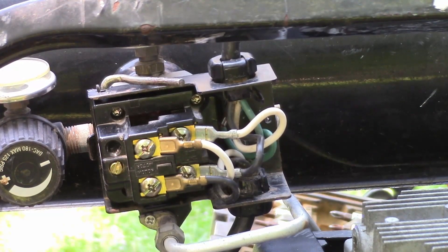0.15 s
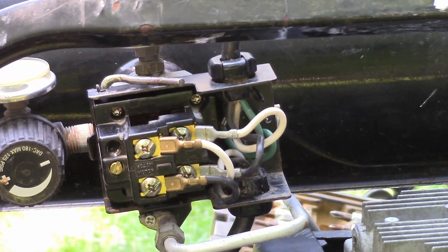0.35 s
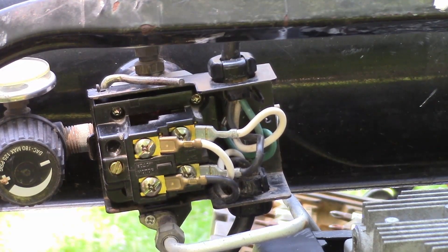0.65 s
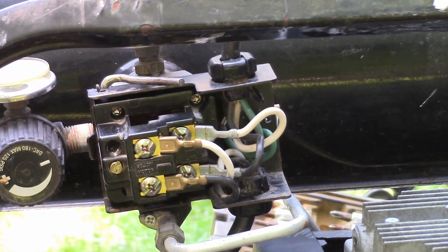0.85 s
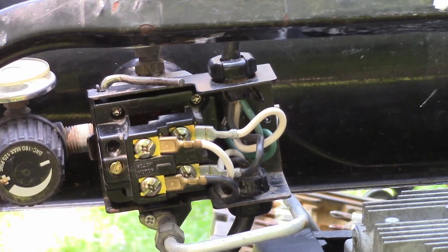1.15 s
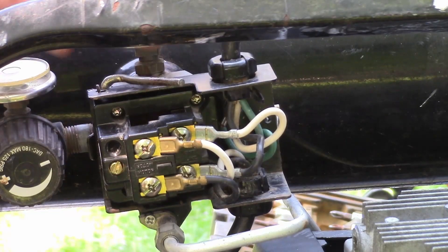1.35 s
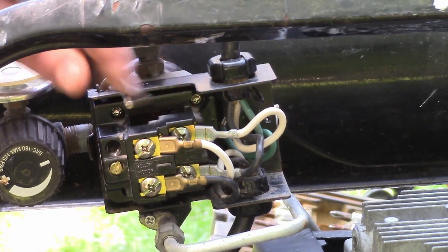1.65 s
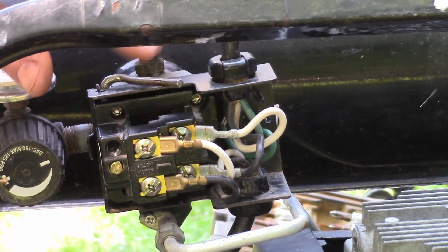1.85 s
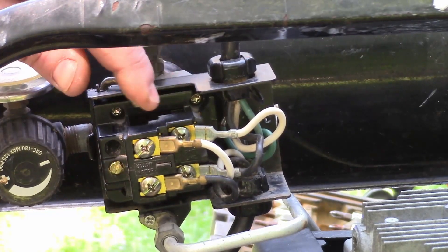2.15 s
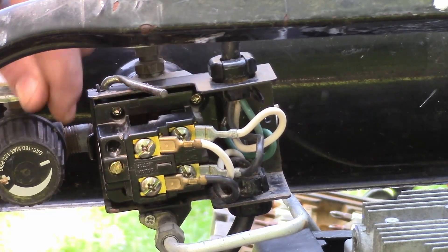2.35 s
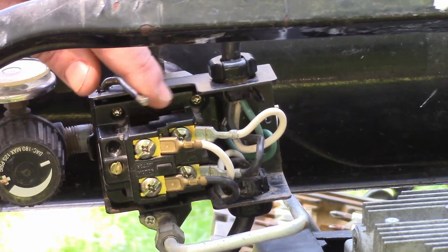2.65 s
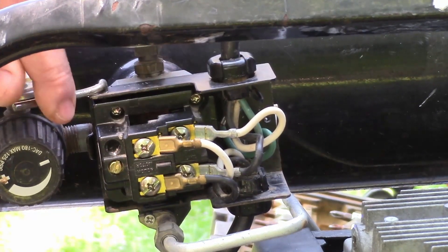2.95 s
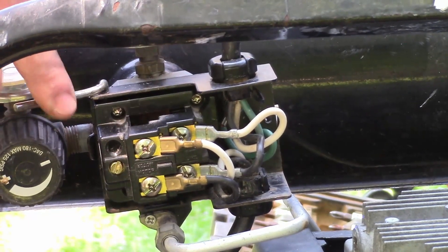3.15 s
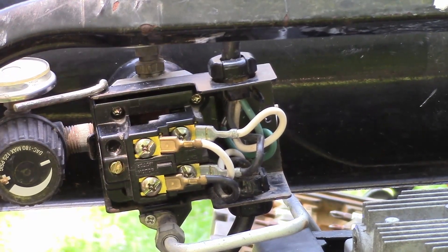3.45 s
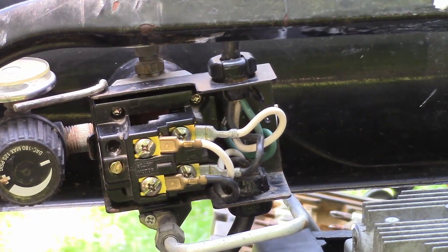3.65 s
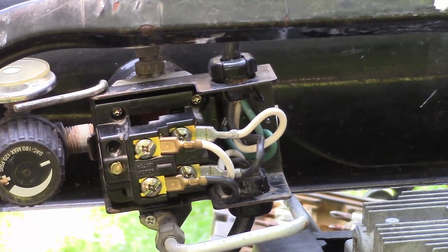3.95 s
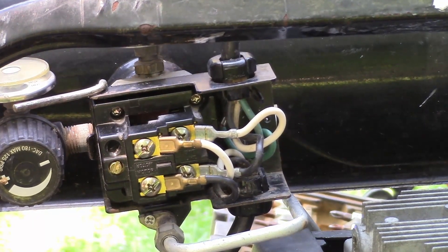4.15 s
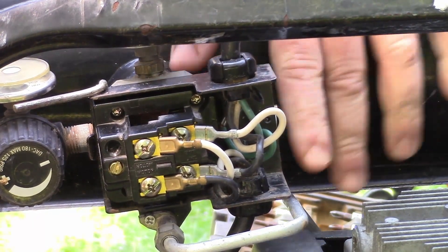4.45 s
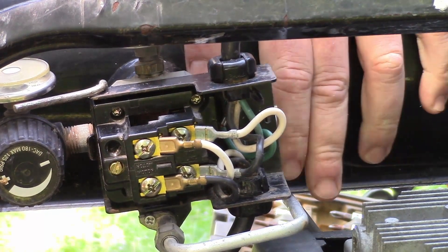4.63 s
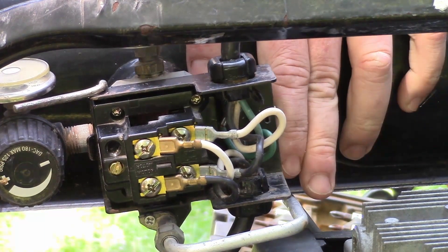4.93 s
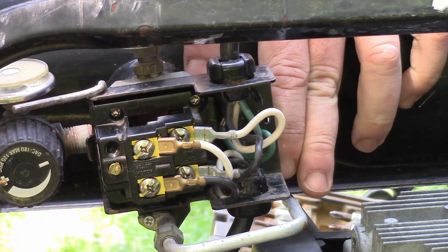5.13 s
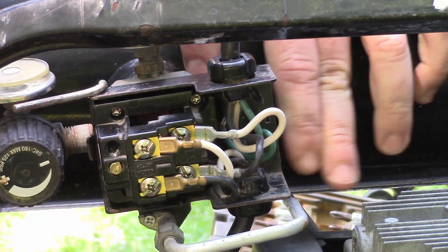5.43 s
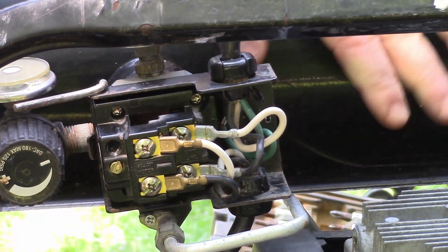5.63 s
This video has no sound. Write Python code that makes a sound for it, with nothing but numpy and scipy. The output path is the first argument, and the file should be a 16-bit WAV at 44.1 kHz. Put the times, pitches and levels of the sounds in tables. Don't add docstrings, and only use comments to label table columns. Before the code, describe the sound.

Close air compressor chugs under a roaring air jet, the motor stops, the hiss cuts off abruptly, leaving a faint yard with birds.

```python
import sys
import numpy as np
from scipy import signal
from scipy.fft import rfft, irfft, next_fast_len
from scipy.io import wavfile
from scipy.ndimage import uniform_filter1d

SR = 44100
rng = np.random.default_rng(int(sys.argv[2]) if len(sys.argv) > 2 else 0)


def volts(x):
    e = np.asarray(x, float) / 20
    return 10 ** e


def transcribe(signal):
    frames = np.atleast_2d(signal).T
    limited = np.clip(frames, -1, 1)
    pcm = np.round(limited * 32767).astype(np.int16)
    wavfile.write(sys.argv[1], SR, pcm)


N = 255339
TIME = np.arange(N) / SR
PAD = next_fast_len(N + SR // 4)
FREQ = np.maximum(np.arange(PAD // 2 + 1) * SR / PAD, 1.)

LAST_STEADY_S = 2.8475
PUSH_S, SHUT_S = 4.88, 5.061
GAIN_STEP_S, GAIN_STEP_DB = 5.2535, 12.5


def level(x, db):
    return x * volts(db) / np.sqrt(np.mean(x ** 2))


def colour(points):
    hz, db = np.transpose(points)
    return volts(np.interp(np.log(FREQ), np.log(hz), db))


def shaped(x, gain):
    return irfft(rfft(x, PAD) * gain, PAD)[:N]


def noise(gain):
    return shaped(rng.standard_normal(N), gain)


def walk(rate_hz, size=N):
    hold = int(SR / rate_hz)
    steps = np.repeat(rng.standard_normal(size // hold + 1), hold)
    return 1.5 * uniform_filter1d(uniform_filter1d(steps, hold), hold)[:size]


def echo(x, t60_s, db):
    t = TIME[:SR]
    tail = rng.standard_normal(len(t)) * np.exp(-np.log(1000) * t / t60_s) * np.minimum(t / .003, 1)
    return signal.fftconvolve(x, tail * volts(db) / np.sqrt(np.sum(tail ** 2)))[:N]


# pitch_hz, level_db (per Hz)
JET_COLOUR = [(35, -71.5), (60, -54), (163, -25), (415, -5.5), (690, -4.5), (1270, -0.5), (1500, -3.5),
              (2320, -5.5), (5500, -3), (7990, -10), (11900, -5), (13900, -16.5), (15700, -19)]
# pitch_hz, width_hz, level_db (over the jet colour)
VALVE_RINGS = [(873, 250, 2), (1266, 200, 2.5), (2000, 170, 2.5), (2770, 150, 3.5), (3280, 170, 3),
               (3760, 130, 2.5), (4640, 280, 4), (5480, 240, 4.5), (6095, 130, 4.5), (6780, 170, 3),
               (7570, 96, 4.5), (8670, 220, 4), (9190, 100, 3), (10570, 400, 1), (11570, 220, -4.5),
               (12600, 220, -3), (14150, 240, 6), (15080, 230, 4.5)]


def valve_colour():
    rings_db = sum(db / (1 + (2 * (FREQ - hz) / width) ** 2) for hz, width, db in VALVE_RINGS)
    return colour(JET_COLOUR) * volts(rings_db)


# low_hz, high_hz
JET_BANDS = [
    (2500, 7000),
    (750, 2500),
    (7000, 15500),
    (380, 750),
]
# time_s, level_db (of the core)
FLOW = [
    (0.0, -29.5),
    (1.67, -32),
    (2.77, -32),
    (2.78, -32.5),
    (3.61, -32.5),
    (4.69, -32),
    (4.87, -32),
]
# level_db (re mean flow), flow_share (dB per dB),
# drift_db_per_s (as the tank empties), last_choke_db
JET_MIX = [
    (0, 0.89, 0, 3),
    (-4.5, 0.33, 0.04, -12),
    (-3.5, 1.7, 0.18, -5),
    (-17.5, .4, 1.11, 5),
]


def jet(swell_db=.25, flicker_db=.85):
    mean_flow_db, push_db, push_length_s = -32, -9.5, 0.081
    choke_s, shut_fall_s = 0.016, 0.0026
    shape = valve_colour()
    flow_s, flow_db = np.transpose(FLOW)
    flow = np.interp(TIME, flow_s, flow_db) - mean_flow_db
    pushed = push_db * np.clip((TIME - PUSH_S) / push_length_s, 0, 1)
    choked = np.clip(1 + (TIME - SHUT_S) / choke_s, 0, 1)

    gain_db = []
    for (low, high), (db, share, drift, choke) in zip(JET_BANDS, JET_MIX):
        wanted_db = mean_flow_db + db + share * flow + drift * TIME + pushed + choke * choked
        power = 4 * np.sum(shape[(FREQ > low) & (FREQ < high)] ** 2) / PAD / 2
        gain_db.append(wanted_db - 10 * np.log10(power))
    gain_db = np.array(gain_db)

    centres = np.log2([np.sqrt(low * high) for low, high in JET_BANDS])
    order = np.argsort(centres)
    air = rfft(rng.standard_normal(N), PAD) * shape
    swell = swell_db * walk(4.71)
    out = np.zeros(N)
    for octave in np.arange(17, 43) / 3:
        blend = np.array([np.interp(octave, centres[order], row[order]) for row in np.eye(4)])
        window = np.maximum(1 - 3 * np.abs(np.log2(FREQ) - octave), 0)
        band = irfft(air * window, PAD)[:N]
        out += band * volts(blend @ gain_db + swell + flicker_db * walk(11))
    return out * np.exp(-np.maximum(TIME - SHUT_S, 0) / shut_fall_s)


# start_s, stroke_db, slap_db
RUNDOWN = [
    (2.884, 1, -8),
    (2.931, -1, -15),
    (2.987, -22, 2.5),
    (3.101, -22, 1.5),
]
# pitch_hz, level_db
INTAKE = [(20, -30.5), (58, -13), (105, -13), (146, 0.5), (230, 3), (300, 1), (370, -1), (450, -25)]
# pitch_hz, level_db
OUTLET = [(100, -31), (150, -11.5), (205, -0.5), (250, -2), (330, -5), (420, -27)]


def pump(slap_s=0.01435, scatter_db=1.0):
    stroke_hz, speed_up_hz_per_s = 29.24, .026
    pump_db, pump_rise_db_per_s, slap_rise_db_per_s = -50.5, 1.48, 0.1
    slap_later_s_per_s = .00012
    ago = np.arange(0, LAST_STEADY_S + 1 / stroke_hz, 1 / stroke_hz)
    steady = LAST_STEADY_S - ago * (1 + .5 * ago * speed_up_hz_per_s / stroke_hz)
    strokes = np.array([(s, 0, slap_rise_db_per_s * s) for s in steady] + RUNDOWN)
    start = strokes[:, 0]
    kick_db = strokes[:, 1:] + scatter_db * rng.standard_normal((len(strokes), 2))

    def pulses(start_s, db, shape):
        at = (start_s * SR).astype(int)
        kicks = np.bincount(at[at >= 0], volts(db)[at >= 0], N)
        return shaped(kicks, colour(shape))

    sucks = pulses(start, kick_db[:, 0], INTAKE)
    slaps = pulses(start + slap_s + slap_later_s_per_s * start, kick_db[:, 1], OUTLET)
    thump = slaps - sucks
    rise_db = pump_rise_db_per_s * np.minimum(TIME, LAST_STEADY_S)
    return thump / np.std(thump[TIME < LAST_STEADY_S]) * volts(pump_db + rise_db)


# time_s, half_length_s, level_db
ROCKS = [
    (2.96, .03, -72),
    (3.19, .035, -65),
    (3.78, .05, -74),
]


def rumble(uneven_db=3.5):
    run_db, jet_db, ground_db = -74, -88, -82
    still_s, settle_s, rock_hz = 2.96, .04, 33
    shake = level(noise(colour([(10, -23), (25, -1), (70, 0.5), (110, -17), (300, -54.5)])), 0)
    motor = volts(run_db) * np.exp(-np.maximum(TIME - still_s, 0) / settle_s)
    venting = volts(jet_db) * (TIME < PUSH_S)
    ground = volts(ground_db) * np.clip((TIME - SHUT_S) / (GAIN_STEP_S - SHUT_S), 0, 1) ** 2
    rocks = np.zeros(N)
    for s, half, db in ROCKS:
        sway = 1.6 * np.sin(2 * np.pi * rock_hz * (TIME - s)) + .9 * shake
        rocks += volts(db) * np.exp(-((TIME - s) / half) ** 2) * sway
    return shake * (motor + venting + ground) * volts(uneven_db * walk(8)) + rocks


# pitch_hz, level_db
TANK_AND_WALLS = [(150, 3), (900, -3), (1250, 2.5), (1700, -2), (4800, -0.5), (5450, 1.5), (6200, -4),
                  (11000, -16), (15700, -18.5)]


def reflected(air):
    dull = shaped(air, colour(TANK_AND_WALLS))
    return air + echo(air, .12, -18) + echo(dull, .5, -28.5)


# time_s, centre_hz
SPLITS = [(.34, 8200), (.94, 12700), (.94, 7070), (.99, 11100), (1.82, 14500), (2.10, 11700), (2.17, 9200),
          (2.49, 15000), (2.49, 5630), (2.70, 11100), (3.01, 10240), (3.01, 7000), (3.03, 4990),
          (3.07, 8800), (3.07, 6400), (3.14, 4700), (3.56, 13800), (3.72, 9640), (3.72, 4700), (3.81, 4680),
          (4.35, 7000), (4.35, 4760), (4.37, 14800), (4.65, 6720)]


def splits(air, width_hz=1500, size=1536):
    out = np.zeros(N)
    hz_axis = np.arange(size // 2 + 1) * SR / size
    for s, hz in SPLITS:
        start = 619 + 1024 * round((s * SR - 619) / 1024) - size // 2
        other = air[start - size:start]
        in_band = np.abs(hz_axis - hz) < width_hz / 2
        out[start:start + size] += np.hanning(size) * irfft(rfft(other) * in_band, size)
    return out


# pitch_hz, level_db (per Hz)
HUSH_COLOUR = [(47, -8), (80, 3.5), (392, -7), (610, -4.5), (1970, -15), (3200, -10), (4460, -18.5),
               (12500, -30), (13500, -33.5), (15700, -38.5)]


def hush():
    return level(noise(colour(HUSH_COLOUR)), -69.0) * volts(.7 * walk(13))


def capsule():
    hiss = noise(colour([(60, 2), (700, -5), (2000, -9), (3500, -14), (7000, -10), (12500, -11), (14000, -25)]))
    return level(hiss, -88.5) * (TIME > SHUT_S)


# start_s, length_s, first_hz, aim_hz, level_db
BIRDS = [
    (5.190, .22, 6600, 5050, -77),
    (5.243, .15, 2750, 2460, -77.5),
    (5.250, .025, 3900, 3780, -80),
    (5.316, .08, 3620, 3400, -77),
    (5.322, .02, 4550, 3400, -83),
    (5.378, .142, 2420, 3970, -76.5),
    (5.400, .08, 2480, 3800, -75.5),
    (5.490, .045, 3400, 1700, -81),
    (5.778, .012, 5200, 5000, -81),
    (5.783, .007, 2100, 1300, -66),
]


def birds(flutter=.4, waver=.028):
    drop_s, fade_db_per_s = .03, 125
    climb_s, swell_s = .052, .012
    out = np.zeros(N)
    for s, length, first_hz, aim_hz, db in BIRDS:
        start = int(s * SR)
        t = TIME[:min(int(length * SR), N - start)]
        if aim_hz > first_hz:
            left = np.exp(-(t / climb_s) ** 2)
            shape = np.minimum(np.minimum(t, length - t) / swell_s, 1)
        else:
            left = np.exp(-t / drop_s)
            shape = np.minimum(t / .004, 1) * volts(-fade_db_per_s * np.maximum(t - drop_s, 0))
        pitch = aim_hz + (first_hz - aim_hz) * left
        pitch = pitch * (1 + waver * walk(350, size=len(t)))
        tone = np.sin(2 * np.pi * np.cumsum(pitch) / SR)
        breath = 1 + flutter * walk(300, size=len(t))
        out[start:start + len(t)] += 1.6 * tone * shape * volts(db) * breath
    wall = np.roll(out, int(.011 * SR)) * (TIME > 1)
    return out + .6 * wall + echo(out, .15, -7)


# pitch_hz, level_db
LEAK_COLOUR = [(1000, -8), (2000, 0), (4500, 2), (5100, -2), (5450, 5), (5800, 3), (12000, 0), (15700, 3)]


def leak():
    leak_s, leak_db, rise_db_per_s, fall_db_per_s = 5.6, -67.5, 284, 58
    air = level(noise(valve_colour() * colour(LEAK_COLOUR)), 1.5)
    late = TIME - leak_s
    return air * volts(leak_db + np.minimum(rise_db_per_s * late, -fall_db_per_s * late))


def scene():
    near = reflected(jet())
    held = volts(-GAIN_STEP_DB * (TIME < GAIN_STEP_S))
    machine = near * held * volts(GAIN_STEP_DB) + pump() + rumble()
    mid = machine + (hush() + leak() + birds()) * held
    side = volts(-1.0) * splits(near) + capsule() * held
    return np.array([mid + side, mid - side])


def band_limit(x):
    return signal.sosfilt(signal.butter(12, 17030, fs=SR, output="sos"), x)


def record(dry):
    top_cut = signal.ellip(12, .2, 75, 15730, fs=SR, output="sos")
    rounded = np.tanh(3 * dry) / 3
    return band_limit(signal.sosfilt(top_cut, rounded))


dry = scene()
out = record(dry)
transcribe(out)
```